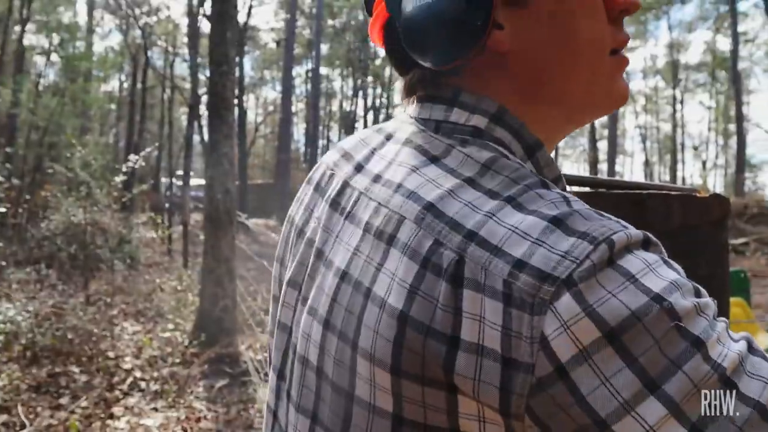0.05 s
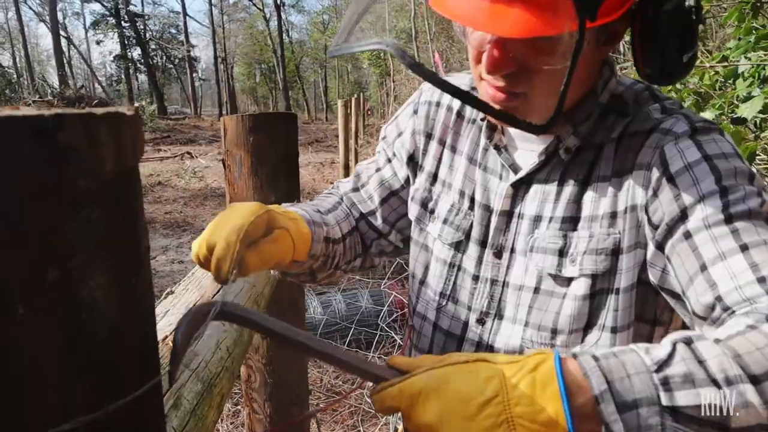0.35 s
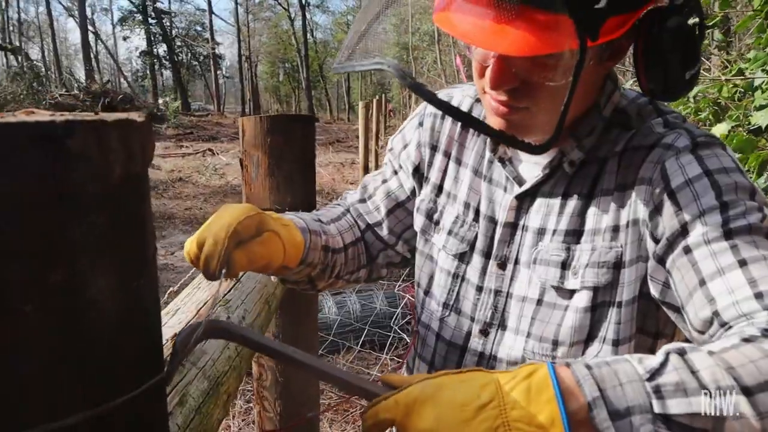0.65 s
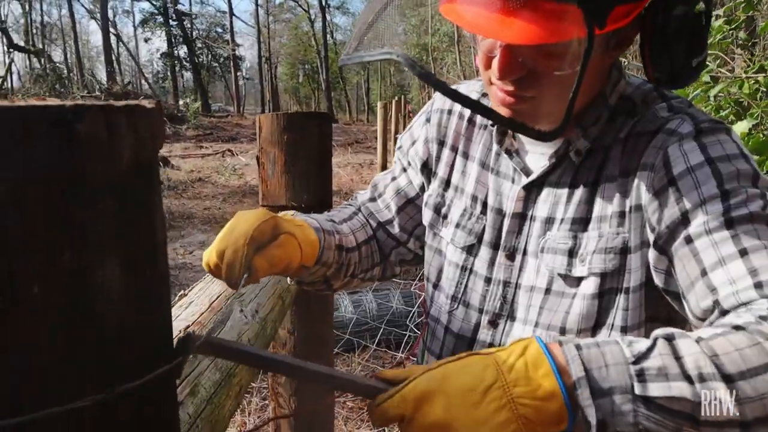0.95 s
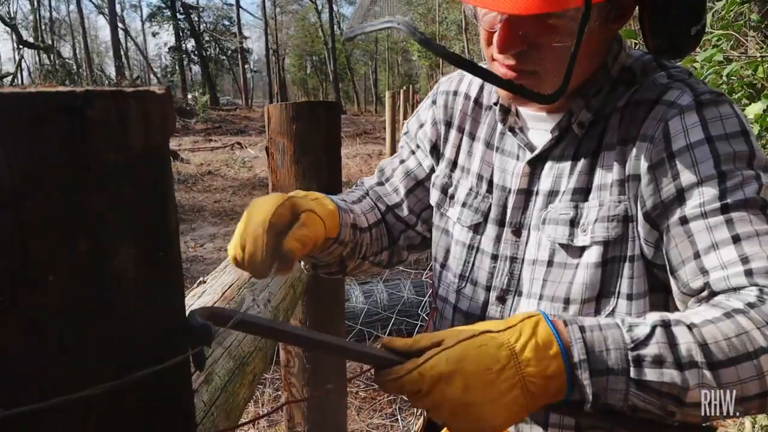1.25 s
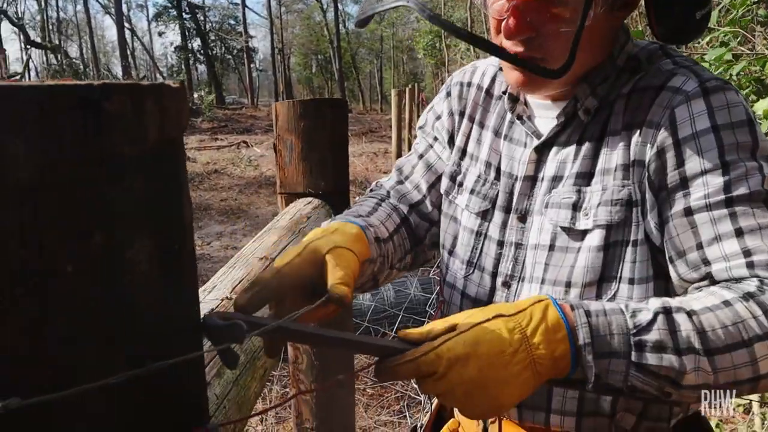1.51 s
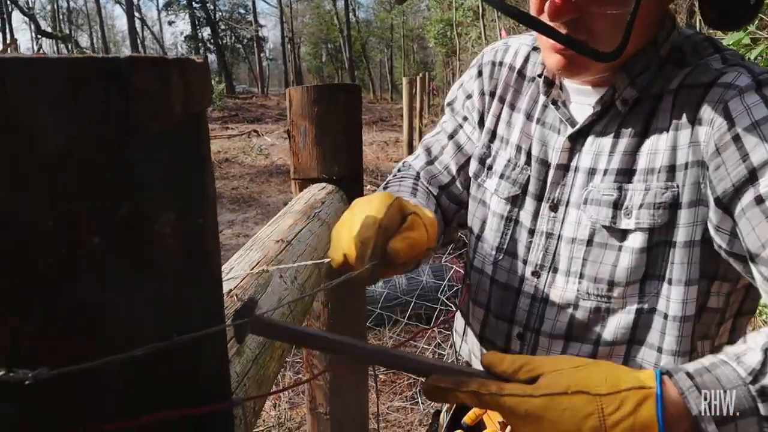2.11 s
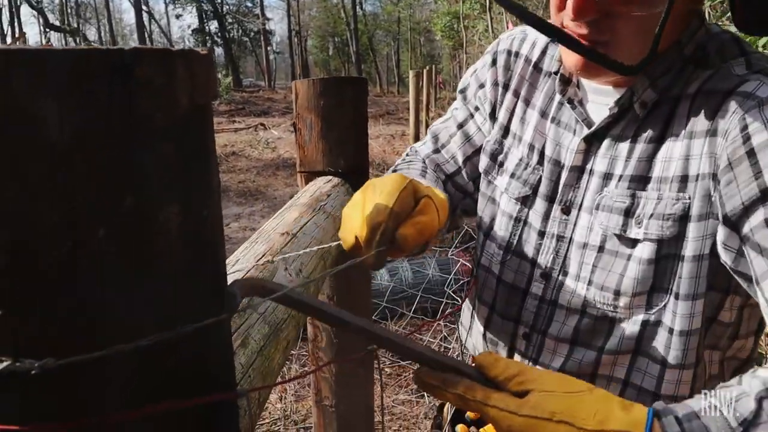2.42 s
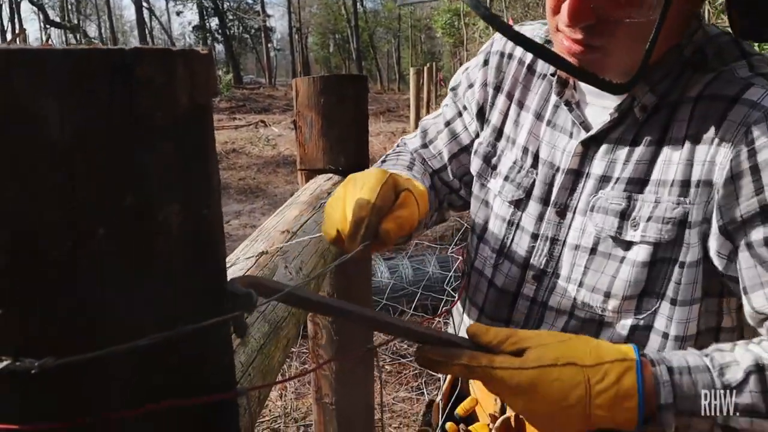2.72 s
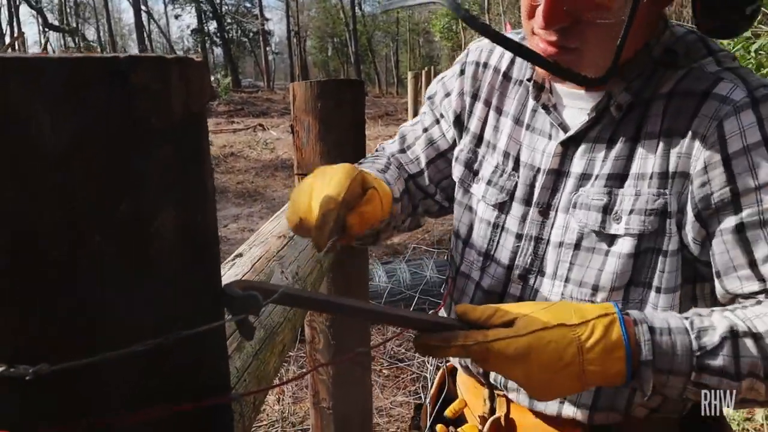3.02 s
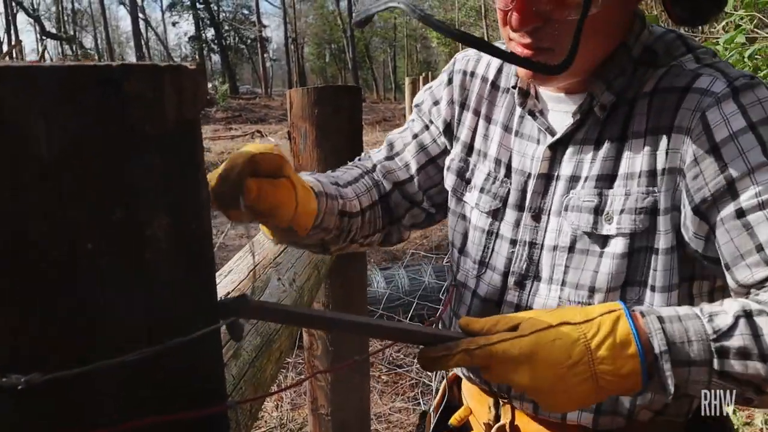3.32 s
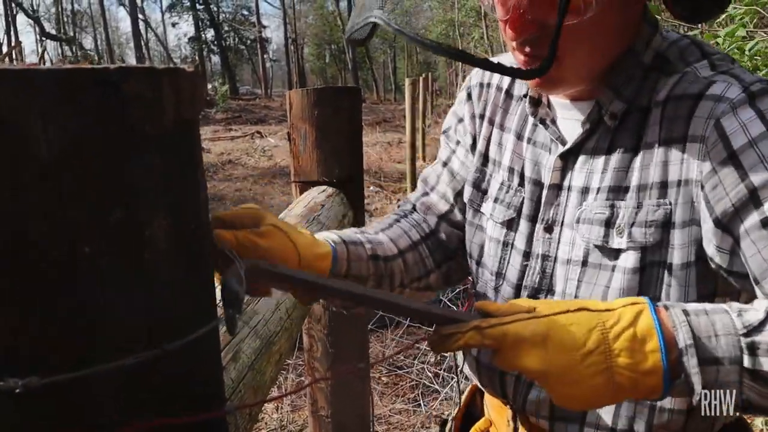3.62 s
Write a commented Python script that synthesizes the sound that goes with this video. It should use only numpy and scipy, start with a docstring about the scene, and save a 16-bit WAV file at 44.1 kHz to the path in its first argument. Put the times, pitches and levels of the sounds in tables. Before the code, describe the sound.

Wire being pried from a wooden post gives scattered metallic ticks and creaks, one sharp snap with a dull thud past the middle, then a few more clinks. Outdoor wind rumbles on the microphone over soft sleeve rustle.

```python
"""Prying fence wire

At the edge of a wood, wire worked with a steel pry bar creaks and clicks by stick-slip friction. It snaps free
and the bar knocks the wooden post; bar, wire end, a strand of tension wire and post ring in damped modes.
Gloves and sleeves rustle by sliding friction between the moves, while turbulent wind buffets the microphone and
air stirs in distant trees."""
import sys
import numpy as np
from scipy import signal
from scipy.fft import rfft, irfft
from scipy.io import wavfile
from scipy.ndimage import uniform_filter1d

SR = 44100
rng = np.random.default_rng(int(sys.argv[2]) if len(sys.argv) > 2 else 0)


def wav_record(signal):
    """Record a signal, one row per channel, as 16-bit PCM in the file named by sys.argv[1]."""
    frames = np.transpose(np.atleast_2d(signal))
    bounded = np.clip(frames, -1, 1)
    # unit amplitude maps onto the largest positive 16-bit level
    quanta = np.round(bounded * 32767).astype(np.int16)
    wavfile.write(sys.argv[1], SR, quanta)


N = 165375
T = np.arange(N) / SR


def from_db(db):
    """Amplitude grows tenfold for every 20 dB."""
    return 10 ** (np.asarray(db) / 20)


def at_hz(spectrum, hz):
    """Interpolation of a spectrum's level in dB on a log-frequency axis."""
    points_hz, db = np.transpose(spectrum)
    return np.interp(np.log(hz), np.log(points_hz), db)


def envelope(curve):
    """Amplitude over time, interpolated in decibels."""
    return from_db(np.interp(T, *np.transpose(curve)))


def unit_power(x):
    """Normalisation to a mean square of one."""
    return x / np.sqrt(np.mean(x ** 2) + 1e-20)


def unit_burst(rows):
    """Normalisation of each row to the energy of 10 ms at unit power."""
    return rows / np.sqrt(np.sum(rows ** 2, axis=1, keepdims=True) / (SR / 100))


def band(x, low_hz, high_hz):
    """Band-pass filtering attenuates what lies outside two edges."""
    return signal.sosfilt(signal.butter(2, [low_hz, high_hz], "band", fs=SR, output="sos"), x)


def coloured(noise, spectrum):
    """Spectral shaping to unit power, falling 12 dB per octave below the first point."""
    hz = np.fft.rfftfreq(N, 1 / SR) + 1e-9
    roll_off = np.minimum(hz / spectrum[0][0], 1) ** 2
    return unit_power(irfft(rfft(noise) * from_db(at_hz(spectrum, hz)) * roll_off, N))


def add(out, start_s, sound):
    """Superposition of a sound from its start time on."""
    i = max(int(start_s * SR), 0)
    out[i:i + len(sound)] += sound[:max(N - i, 0)]


def partials(t, low_hz, high_hz, contacts, spacing_hz=250):
    """Constant modal density: each contact excites its own random sines, more in a wider band."""
    width_hz = high_hz - low_hz
    draws = rng.random((int(np.ceil(width_hz / spacing_hz)), 2, contacts, 1))
    return sum(np.sin(2 * np.pi * ((low_hz + width_hz * place) * t + phase)) for place, phase in draws)


# Slips of the wire on bar and post, before colouring: start_s, length_s, body_db, bite_db, crack_db
WIRE_SLIPS = [(0.227, .012, -47, -45, -53), (0.267, 0.044, -55, -37.5, -48),
              (0.347, 0.0068, -45.5, -52, -53.5), (0.4432, 0.0039, -40, -40, -53),
              (0.462, 0.0019, -47, -33.5, -63), (0.474, 0.013, -42.5, -45, -55),
              (0.537, 0.0044, -47, -49, -64), (0.57, 0.0041, -44, -40, -55),
              (.885, 0.0022, -45.5, -55, -76), (0.919, .003, -44, -52, -65),
              (1.122, 0.0047, -47, -50.5, -63), (1.14, 0.015, -49, -45, -60),
              (1.5247, 0.0053, -38.5, -40, -80), (1.537, 0.006, -34.5, -32.5, -49),
              (1.594, 0.0037, -46, -46, -49), (2.058, 0.012, -37.5, -41, -43.5),
              (2.089, 0.0019, -34, -41, -51), (2.12, 0.0053, -30, -41.5, -62),
              (2.144, 0.003, -30.5, -45, -58), (2.1724, 0.0029, -22.5, -20, -23),
              (2.203, 0.018, -29, -37.5, -60), (2.235, 0.019, -33, -41, -58),
              (2.256, 0.0019, -26, -38, -45), (2.26, 0.0025, -30, -59, -62), (2.377, 0.0025, -41, -40, -54),
              (2.414, 0.03, -57, -38, -67), (2.45, 0.0056, -67, -39, -66), (2.545, 0.0021, -36, -43.5, -64),
              (2.587, 0.0075, -36, -50, -70), (2.6, 0.005, -35.5, -36, -59), (2.659, 0.0018, -55, -39, -57),
              (3.0678, 0.0066, -36.5, -35, -51), (3.4, 0.0083, -46, -50, -68)]
# Colouring common to all slips: frequency_hz, gain_db
SLIP_SPECTRUM = [(250, -31), (400, -18), (600, -15.5), (850, -10.5), (1250, -6.5), (1600, -7),
                 (2000, -12.5), (2600, -8), (3400, -11.5), (4500, -6.5), (5800, -8.5), (7500, -16.5),
                 (10000, -8), (15000, -8)]
BODY_HZ, BITE_HZ, CRACK_HZ = 1450, 3900, 9600


def wire_slips(rise_s=.0001, clink_decay_s=.008, clink_db=-9, spread_db=2.5):
    """Stick-slip friction: each slip grinds briefly and leaves a dense clink, the treble first."""
    starts_s, lengths_s, *zones_db = np.transpose(WIRE_SLIPS)
    log_zones = np.log([BODY_HZ, BITE_HZ, CRACK_HZ])
    edges_hz = np.geomspace(14, 17500, 32)
    edges_hz = edges_hz[edges_hz > 220]
    t, bursts = T[:SR // 10], 0
    for low, high in zip(edges_hz, edges_hz[1:]):
        hz = np.sqrt(low * high)
        slowness = np.sqrt(1000 / hz)  # lower bands start later and last longer
        lag_s, stretch = .00039 * slowness, 2.14 * slowness
        grind_decay_s = .0016 * stretch
        age = np.maximum(t - lag_s, 0)
        since_end = np.maximum(age - lengths_s[:, None] * min(1, stretch), 0)
        rise = 1 - np.exp(-age / rise_s)
        noise = rng.standard_normal(since_end.shape)
        grind = band(noise * rise * np.exp(-since_end / grind_decay_s), low, high)
        clink = rise * partials(age, low, high, len(starts_s)) * np.exp(-since_end / clink_decay_s)
        clink_gain = from_db(clink_db + spread_db * rng.standard_normal((len(starts_s), 1)))
        band_db = np.array([np.interp(np.log(hz), log_zones, row) for row in np.transpose(zones_db)])
        band_gain = from_db(band_db + at_hz(SLIP_SPECTRUM, hz))[:, None]
        bursts = bursts + band_gain * (unit_burst(grind) + clink_gain * unit_burst(clink))
    out = np.zeros(N)
    for start_s, burst in zip(starts_s, bursts):
        add(out, start_s, burst)
    return out


# Resonances of the taut wire on the post: pitch_hz, bandwidth_hz, gain_db
TAUT_RESONANCES = [(979, 19, -5.5), (1248, 21, -1), (1612, 24, -13), (2435, 39, -7.5)]


def taut_wire(drive):
    """Forced vibration: the driving sound is heard with the short resonances that it excites."""
    return drive + sum(from_db(db) * signal.lfilter(*signal.iirpeak(hz, hz / width, fs=SR), drive)
                       for hz, width, db in TAUT_RESONANCES)


def ringing(modes, favoured_hz, loss_db_per_octave, sustain):
    """Free vibration: modes decay exponentially; those far from the favoured pitch are excited less."""
    t, out = T[:SR // 2], 0
    for hz, db, t60_s in modes:
        loss_db = loss_db_per_octave * abs(np.log2(hz / favoured_hz))
        decay = np.exp(-np.log(1000) * t / (t60_s * sustain))
        out = out + rng.choice([-1, 1]) * from_db(db - loss_db) * np.sin(2 * np.pi * hz * t) * decay
    return out


# Modes of bar, loose wire end, a strand of tension wire, and post with the bar against it: pitch_hz, level_db,
# free_t60_s
BAR_MODES = [(1290, -9, .09), (1445, -13, .09), (2287, -8, .06), (3926, -4, .12), (4212, -6.5, .08),
             (4710, -9, .07), (5085, -1, .125), (6025, -3.5, .1), (9030, -17, .09), (12000, -10, .1)]
WIRE_END_MODES = [(1040, -3, .07), (1529, -11, .18), (3225, 0, .24), (3935, -6, .2), (5254, -2, .18),
                  (6463, -13, .19), (10930, -14, .11), (13280, -21, .15)]
TENSION_STRAND_MODES = [(1020, 0, .17), (2264, -4, .13), (3018, -7, .15), (3913, -2, .14), (4180, -2, .11),
                        (8230, -18, .09), (9889, -15, .12), (10945, -11, .12)]
POST_MODES = [(150.3, -3, 0.237), (227, -7.5, 0.06), (310, -13.5, 0.12), (480, -9, 0.06), (568, -7, 0.083),
              (690, -5, 0.045), (765, -10, 0.06), (908, -14, 0.1), (1215, -19, 0.07), (1630, -6, 0.035),
              (3930, -19, 0.08), (4212, -9.5, 0.045), (4712, -20, 0.09)]
# Blows on each body: start_s, level_db, favoured_hz, loss_db_per_octave, sustain_ratio
BAR_BLOWS = [(.571, -39, 3800, 25, 0.95), (2.1732, -25.5, 5500, 3.5, 1), (2.603, -39, 2400, 10, 0.76),
             (3.071, -23.5, 3830, 27, 0.44)]
WIRE_END_BLOWS = [(1.125, -41, 5560, 16, 0.77), (1.539, -33.5, 3300, 4.3, 0.77),
                  (2.091, -47, 5600, 8, 0.76), (2.174, -34, 8000, 8, .65)]
TENSION_STRAND_BLOWS = [(.445, -35.5, 9500, 1.9, 0.82), (0.474, -35, 2090, 4.7, 0.69), (.572, -41.5, 11000, 6, .8),
                        (2.378, -34.5, 1000, 6.2, 0.62)]
POST_BLOWS = [(.665, -29.5, 650, 22, 0.5), (2.175, -14, 560, 16, 0.26), (2.258, -16, 150, 0, 0.93)]


def blows():
    """Impact excitation: steel rings and the post thuds; damping by the grip shortens the ring."""
    out = np.zeros(N)
    for modes, hits in ((BAR_MODES, BAR_BLOWS), (WIRE_END_MODES, WIRE_END_BLOWS),
                        (TENSION_STRAND_MODES, TENSION_STRAND_BLOWS), (POST_MODES, POST_BLOWS)):
        for start_s, db, favoured_hz, loss_db_per_octave, sustain in hits:
            add(out, start_s, from_db(db) * ringing(modes, favoured_hz, loss_db_per_octave, sustain))
    return out


# Brief narrow-band sounds: a faint high chirp, dull bumps, a squeak and the bright edges of wire clicks
# peak_s, centre_hz, level_db, half_width_s
BRIEF_SOUNDS = [(0.14, 5760, -53.5, 0.033), (.148, 296, -40, 0.018), (0.178, 1165, -46, 0.027),
                (0.291, 2080, -44.5, 0.011), (0.475, 2230, -40.5, 0.0033), (1.536, 1180, -30.5, 0.0061),
                (0.493, 3580, -43.5, .003), (2.44, 14000, -60, .018), (2.605, 14000, -52, .004),
                (3.711, 457, -38, 0.0029)]


def brief_sounds():
    """Amplitude modulation: narrow-band noise swells and fades under a bell-shaped envelope."""
    out = np.zeros(N)
    for peak_s, hz, db, half_width_s in BRIEF_SOUNDS:
        swell = np.exp(-.5 * ((T - peak_s) / half_width_s) ** 2)
        burst = band(rng.standard_normal(N), hz / 1.12, hz * 1.12) * swell
        out += from_db(db) * burst * np.sqrt(np.sum(swell ** 2) / np.sum(burst ** 2))
    return out


# Rubbing of gloves and sleeves: time_s, level_db
RUB_LEVELS = [(0, -54), (.14, -49), (.2, -50.5), (.29, -43.5), (.33, -47), (.42, -47), (.55, -50),
              (.8, -55), (1.05, -55), (1.42, -55.5), (1.56, -47), (1.7, -46.5), (1.86, -46), (1.98, -54),
              (2.2, -42), (2.34, -53.5), (2.43, -43.5), (2.52, -52.5), (2.68, -51), (2.76, -48.5),
              (3.12, -54), (3.42, -51), (3.53, -48), (3.62, -52), (3.67, -45), (3.75, -43.5)]
# Spectrum of leather and cloth: frequency_hz, gain_db
CLOTH_SPECTRUM = [(200, 4), (500, 2), (800, 2), (1250, 2.5), (1900, -2.5), (2700, -5), (4000, -2),
                  (4700, -8.5), (5600, -9.5), (7500, -20), (11000, -21), (16000, -27)]


def rustle(grains_per_s=450, grain_share=.22):
    """Sliding friction: leather and cloth make a hiss with small random impulses in it."""
    grains = unit_power((rng.random(N) < grains_per_s / SR) * rng.laplace(size=N))
    friction = np.sqrt(grain_share) * grains + np.sqrt(1 - grain_share) * rng.standard_normal(N)
    return envelope(RUB_LEVELS) * coloured(friction, CLOTH_SPECTRUM)


# Spectrum of the eddies at the microphone: frequency_hz, gain_db
EDDY_SPECTRUM = [(15, -16), (24, -3), (35, 0.5), (50, -5.5), (70, -12), (100, -17.5), (150, -26),
                 (250, -38), (500, -56), (4000, -105)]
# Strength of the breeze: time_s, level_db
BREEZE_LEVELS = [(0, -46), (.205, -39.5), (.235, -26.5), (1.55, -26), (2.03, -33), (2.45, -29.5),
                 (2.85, -27), (3.75, -36)]
# Single buffets on top of it: peak_s, level_db, half_width_s
WIND_BUFFETS = [(0.3, -17.5, 0.023), (0.507, -21.5, 0.018), (.59, -22.5, 0.031), (0.845, -19, 0.033),
                (1.09, -20, 0.037), (1.305, -16.5, 0.032), (1.414, -20, 0.021), (2.569, -18.5, 0.025),
                (2.737, -18, 0.055)]


def wind(levelling_s=.076, rumble_cutoff_hz=67.4):
    """Turbulent pressure at the microphone: eddies follow the breeze, and buffets add deep rumble."""
    eddies = coloured(rng.standard_normal(N), EDDY_SPECTRUM)
    local_power = uniform_filter1d(eddies ** 2, int(levelling_s * SR))
    even_eddies = eddies / np.sqrt(uniform_filter1d(local_power, SR // 50) + 1e-6)
    low_pass = signal.butter(1, rumble_cutoff_hz, fs=SR, output="sos")
    rumble = unit_power(signal.sosfiltfilt(low_pass, even_eddies))
    breeze = envelope(BREEZE_LEVELS)
    buffet_power = sum(from_db(db) ** 2 * np.exp(-((T - peak_s) / half_width_s) ** 2)
                       for peak_s, db, half_width_s in WIND_BUFFETS)
    excess = np.sqrt(breeze ** 2 + buffet_power) - breeze
    return breeze * even_eddies + excess * rumble


# Spectrum of air in the trees: frequency_hz, gain_db
AIR_SPECTRUM = [(60, 7), (150, 2.5), (300, 0), (500, -1.5), (1200, -11), (2200, -20.5), (4000, -30),
                (6000, -25), (8000, -24), (16000, -26.5)]


def distant_air(level_db=-49.5):
    """Flow noise: air in distant trees makes a steady broadband hush."""
    return from_db(level_db) * coloured(rng.standard_normal(N), AIR_SPECTRUM)


def scene():
    """Superposition in the open air: all sources add in one channel."""
    return (taut_wire(wire_slips() + rustle()) + blows() + brief_sounds() + wind() + distant_air())[None]


def record(dry):
    """Band limiting: a steep low-pass filter removes the highest treble."""
    cutoff_hz = 15900
    return signal.sosfilt(signal.ellip(10, .1, 80, cutoff_hz, fs=SR, output="sos"), dry)


dry = scene()
out = record(dry)
wav_record(out)
```